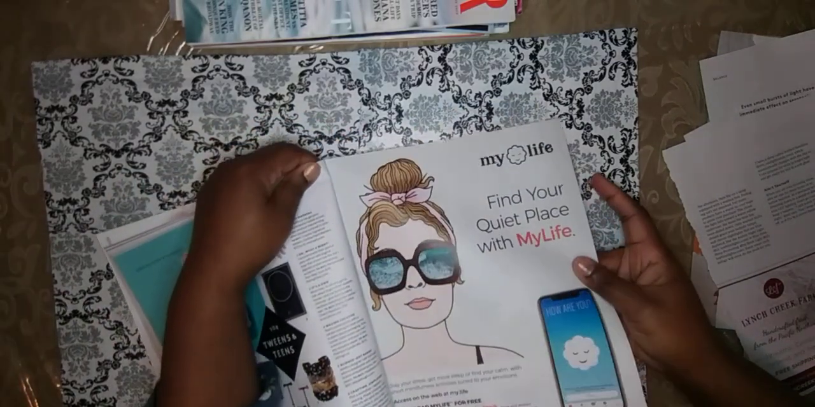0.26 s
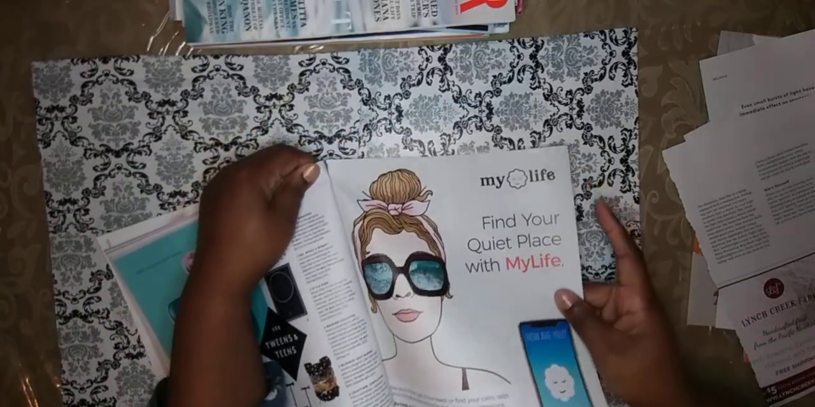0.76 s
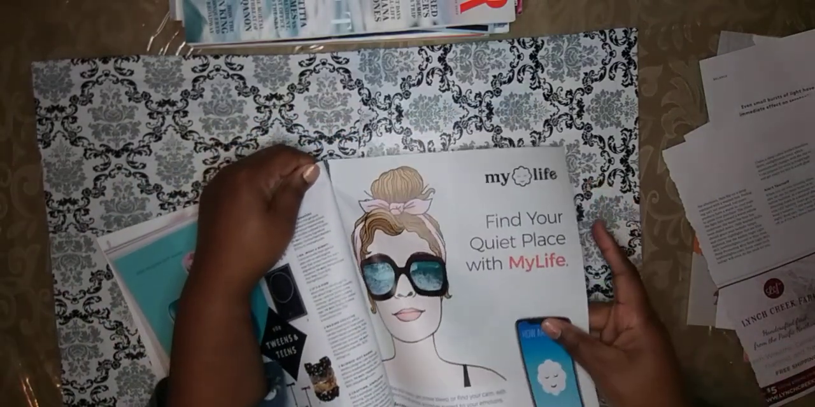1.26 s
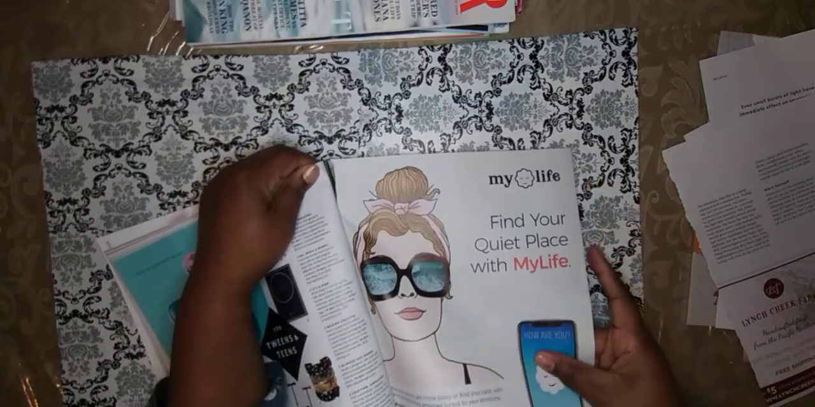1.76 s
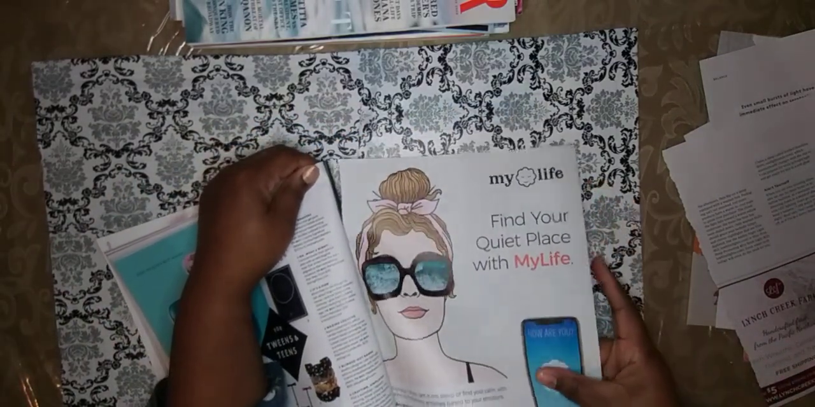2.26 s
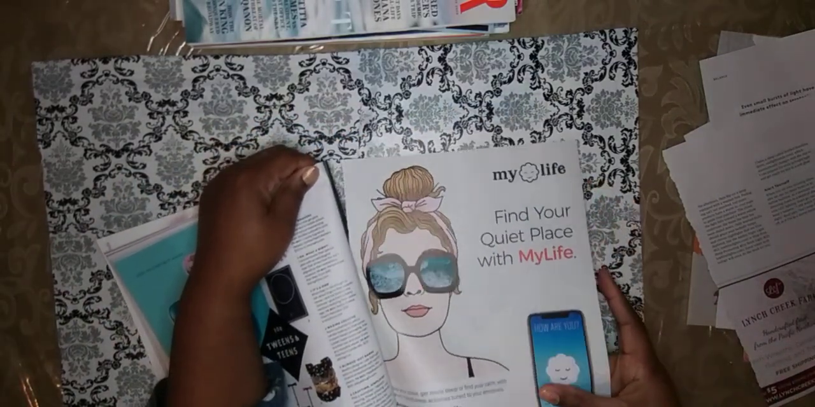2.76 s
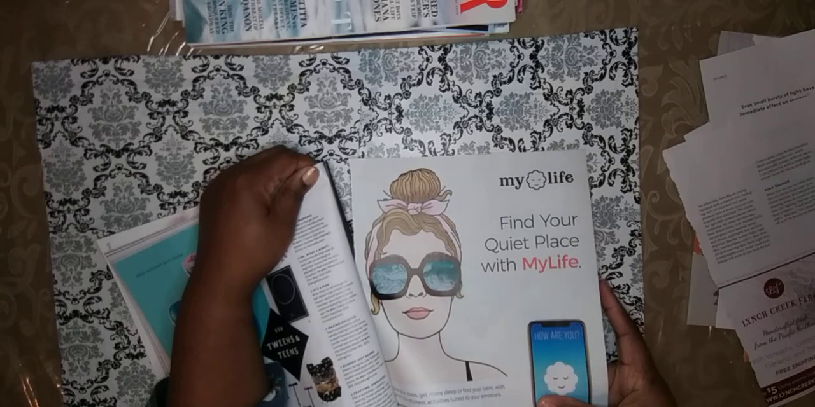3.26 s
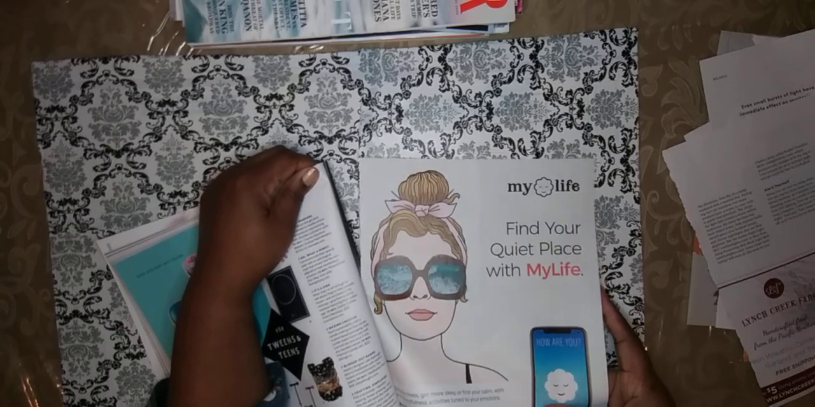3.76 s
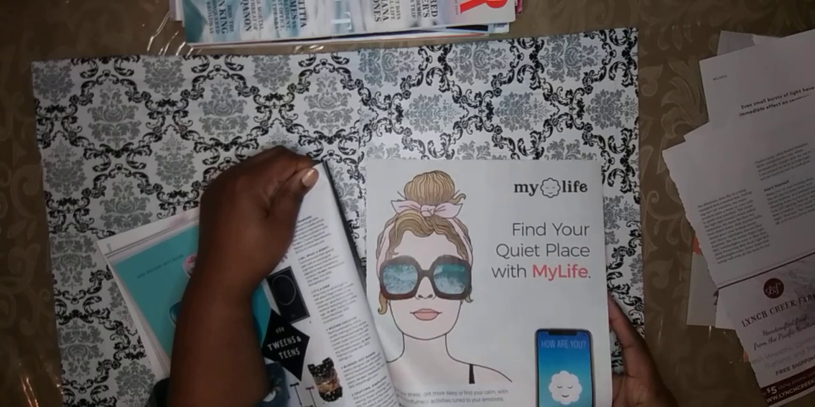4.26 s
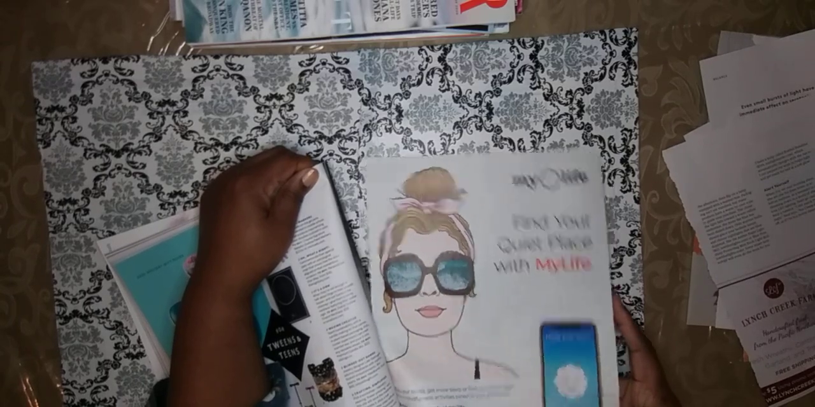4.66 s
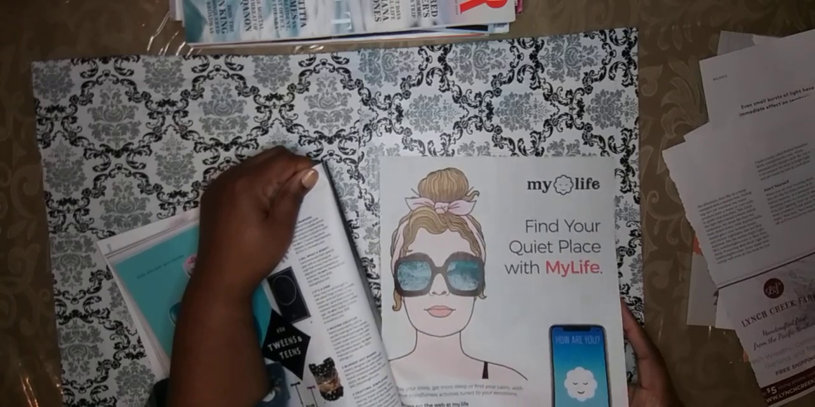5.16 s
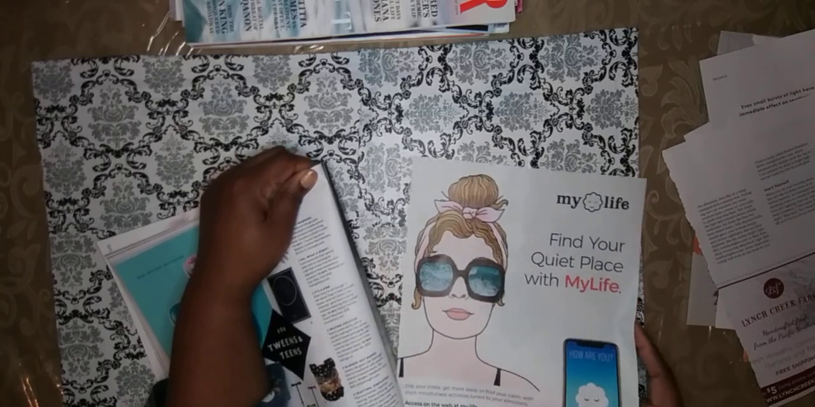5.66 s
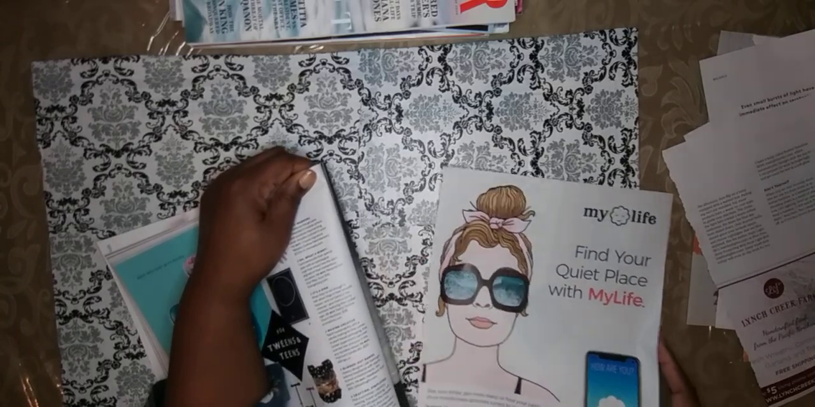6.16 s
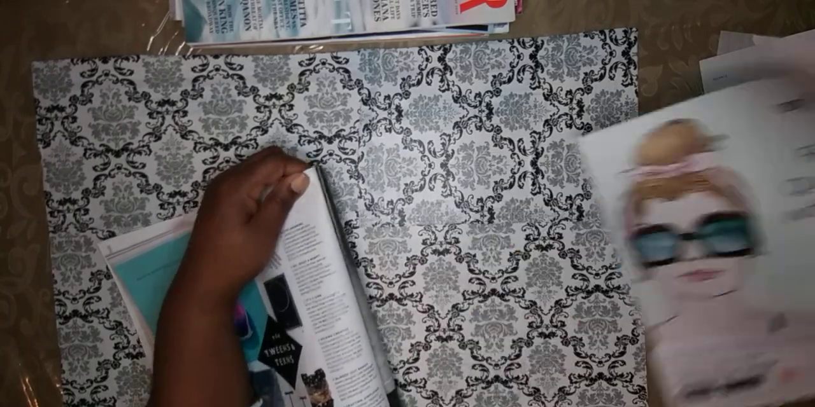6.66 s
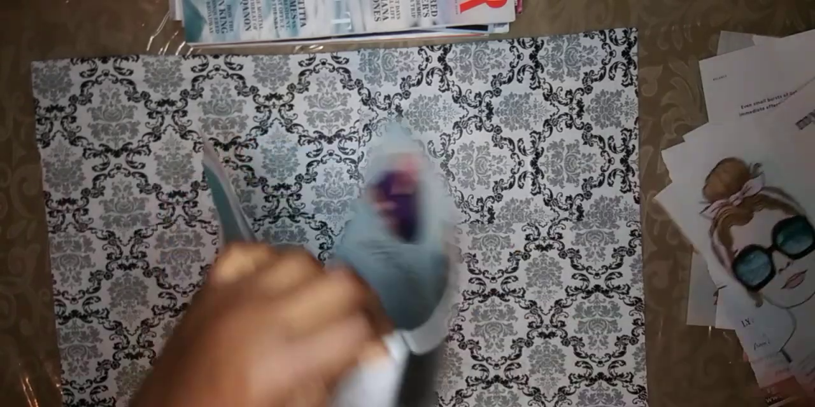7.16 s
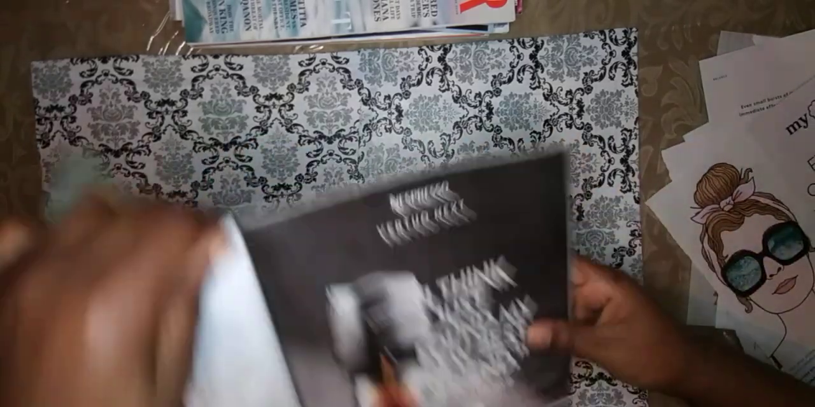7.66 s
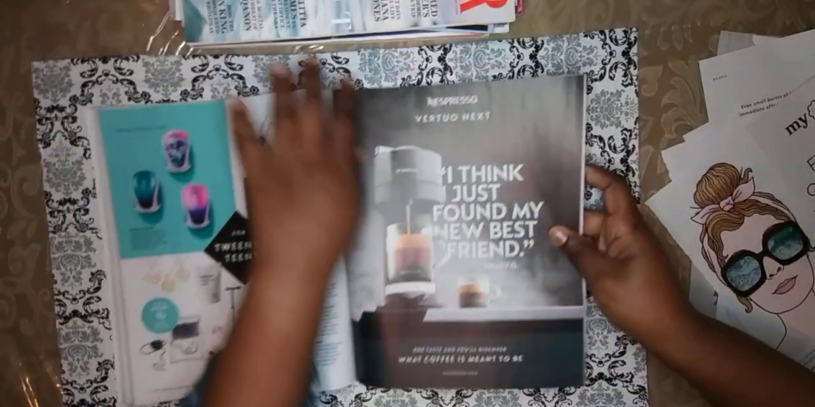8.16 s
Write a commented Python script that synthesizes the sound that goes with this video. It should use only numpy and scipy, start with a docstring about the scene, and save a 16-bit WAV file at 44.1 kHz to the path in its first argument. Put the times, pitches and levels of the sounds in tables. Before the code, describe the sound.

Close, crisp paper tearing in a dozen or so separate tugs along a spine, followed by rustling, light knocks and a faint room hum.

```python
"""In a small room with a mains hum, a glossy page is torn out of a magazine close to the microphone.
It goes along the spine in thirteen short rips; then the loose page is laid aside and the magazine turned over.
Each rip is a few tugs in which the tear sticks and slips; each slip is a volley of random clicks, the snapping
fibres, filtered by the modes of the taut sheet. Buckles and knocks are decaying crackles, rubbing is
uneven grainy noise, the hum is a sum of sines, and sparse decaying reflections make the room."""
import sys
import numpy as np
from scipy import signal
from scipy.fft import rfft, irfft
from scipy.io import wavfile

SR = 44100
rng = np.random.default_rng(int(sys.argv[2]) if len(sys.argv) > 2 else 0)


def transcribe(signal):
    """Save signal, clipped to [-1, 1], as a 16-bit WAV file at the path in sys.argv[1]."""
    frames = np.atleast_2d(signal).T
    limited = np.clip(frames, -1, 1)
    pcm = np.round(limited * 32767).astype(np.int16)
    wavfile.write(sys.argv[1], SR, pcm)


N = 370440  # length in samples

# Hum of mains and motors. Each row: frequency in Hz, level in dB.
HUM_TONES = [(58.8, -44), (105, -51.5), (120, -48), (178, -61)]
# Spectrum of the air noise. Each row: frequency in Hz, relative level in dB.
AIR_SPECTRUM = [(15, -25), (30, -16), (45, -9.5), (68, 3.5), (90, -1), (140, -7), (165, -9.5), (215, -6),
                (270, -15.5), (470, -8.5), (640, -16.5), (1500, -25), (5500, -36.5), (9000, -42),
                (16000, -33)]
# Resonance of the microphone in the top octave. Each row: frequency in Hz, gain in dB.
MIC_RESPONSE = [(6000, 0), (7200, 4.5), (8000, 7.5), (8700, 12), (9250, 7), (10000, -1.5), (11300, -14),
                (15500, -13.5)]
# Reverberation time. Each row: frequency in Hz, time to decay by 60 dB in seconds.
ROOM_T60 = [(150, 0.05), (1000, 0.46), (4000, 0.39), (9000, 0.29), (15000, 0.02)]
# Strength of the reverberation. Each row: frequency in Hz, level in dB.
ROOM_LEVEL = [(150, -13), (700, -7), (2500, -7), (6000, -6), (8700, -13), (11000, -6), (15000, 3)]
# Reflections from the table and the magazine. Each row: delay in seconds, gain as a factor.
NEAR_REFLECTIONS = [(.0014, 0.096), (.0034, 0.23), (.0052, 0.18), (.0087, .18)]

# Strokes of paper on paper or skin. Each row: start in seconds, end in seconds, level of the low rustle
# in dB, level of the high hiss in dB.
STROKES = [(0.071, .111, -47, -58), (0.925, 1.059, -43.5, -42.5), (1.016, 1.155, -38, -66.5),
           (1.438, 1.69, -48, -44.5), (2.171, 2.43, -49.5, -45.5), (2.67, 2.823, -43.5, -50.5),
           (4.312, 4.414, -43.5, -64), (4.493, 4.613, -54, -43), (4.613, 4.848, -46, -47),
           (5.42, 5.52, -51, -49), (5.87, 6.16, -43, -39), (6.308, 6.504, -52, -39),
           (6.542, 6.717, -50.5, -75), (6.716, 6.882, -50, -45.5), (6.851, 7.002, -48, -40.5),
           (6.949, 7.635, -60, -47.5), (7.499, 7.81, -54.5, -45), (7.924, 7.994, -51.5, -50),
           (8.261, 8.44, -75, -53.5)]
# Colour of the low rustle. Each row: frequency in Hz, relative level in dB.
RUSTLE_COLOUR = [(150, -19), (500, 0), (1100, 1.5), (1900, 2.5), (3000, -4.5), (4500, -5), (9000, -38),
                 (16000, -20)]
# Colour of the high hiss. Each row: frequency in Hz, relative level in dB.
HISS_COLOUR = [(1000, -25), (3500, -1.5), (5000, 0.5), (7000, -1), (9000, -1), (16000, -3.5)]

# Knocks of paper on the table. Each row: time in seconds, level in dB, weight of the thud in dB,
# hollow ring in dB, decay time in seconds.
KNOCKS = [(6.597, -33, -22, -14, 0.0067), (6.696, -25, -14, 13, 0.0081), (6.753, -23, -11, 10.5, 0.0055),
          (7.669, -31.5, -11, 2, 0.028), (7.783, -29, 7, -1, .027), (8.047, -20.5, 1, -2, .005),
          (8.174, -43.5, -10, 8, 0.0094)]
# Colour of a knock. Each row: frequency in Hz, relative level in dB.
KNOCK_COLOUR = [(40, -13.5), (90, 3), (170, 1), (240, 0.5), (315, -1.5), (400, 3), (600, -1), (730, 0.5),
                (1100, -3), (2500, -16), (6000, -27), (16000, -54)]
# Buckles of the sheet. Each row: time in seconds, level in dB, brightness in dB, decay time in seconds.
BUCKLES = [(.1257, -6.5, 0, 0.00098), (.134, -22, -13, 0.0034), (.144, -28.5, -30, 0.034),
           (.431, -32.5, -16, 0.0021), (.472, -39.5, -30, .004), (.965, -26, -9, 0.0023),
           (1.047, -23.5, -4, 0.0057), (1.056, -21, -10, .012), (1.122, -25.5, -7.5, 0.0045),
           (1.588, -28, -9, 0.0044), (2.728, -34.5, 8, 0.0056), (2.762, -39, -12, 0.0066),
           (3.553, -34, -4, 0.0045), (3.723, -39.5, -11, 0.004), (5.1267, -33.5, -7, 0.002),
           (6.326, -35.5, -8, 0.0098), (6.389, -35.5, -17, .0056), (6.55, -41, -21, .0046),
           (6.595, -42, -24, 0.0034), (6.659, -40.5, -32, 0.013), (6.877, -37.5, -18, 0.0025),
           (6.899, -36, -8, .006), (7.395, -40.5, 0, 0.0087), (7.53, -37, -9, .0034),
           (7.584, -44, -22, .0045), (7.67, -34, -9, 0.017), (7.783, -29, -16.5, 0.0047),
           (8.047, -27, 2.5, 0.0014)]
# Colour of a buckle. Each row: frequency in Hz, relative level in dB.
BUCKLE_COLOUR = [(80, -23), (250, -10.5), (500, -2.5), (1000, 1.5), (2400, 2.5), (4000, 0), (6500, -2),
                 (9000, -2.5), (16000, -8)]
# Single fibres that give way under tension. Each row: time in seconds, level in dB.
TICKS = [(1.155, -26), (1.2327, -29), (1.2535, -28), (1.702, -24), (2.181, -25), (3.2027, -31),
         (3.8123, -32), (4.2623, -32), (5.4421, -26.5)]

# The rips. Each row: start in seconds, drumming of the taut sheet in dB, brightness in dB, slackness in dB.
RIPS = [(.70, -30, 0.5, 0), (1.22, -14, 9.5, 0.5), (1.658, -12, 1, 1.5), (1.931, -2, 1, -1.5),
        (2.432, .5, 8, -1), (2.931, 1, 10, -1), (3.35, 2.5, 5.5, 0), (3.87, 3, 5.5, -1), (4.39, 3, 5, -1),
        (4.801, -1, -0.5, 3.5), (5.20, -3, 0, 3.5), (5.51, -1.5, -2.5, 6), (5.761, -11, -6.5, 6.5)]
# Tugs on the page. Each row: start in seconds, length in seconds, level of the first slip in dB,
# change of level by the last slip in dB.
TUGS = [(0.715, 0.016, -11.5, -14), (0.735, 0.03, -9, 1.5), (1.2668, 0.062, -7.3, -2),
        (1.34, 0.029, -14.5, -0.5), (1.6708, 0.00081, -22, 0), (1.7115, .001, -22, 0),
        (1.7179, 0.00081, -11.5, 0), (1.954, 0.048, -10, -15), (2.009, .016, -8, -8),
        (2.037, 0.028, -21, -3), (2.4488, .034, -9.5, -9.5), (2.4853, .022, -13.5, -6),
        (2.513, .001, -12, 0), (2.521, .028, -14.5, 1), (2.559, 0.034, -24, 8), (2.946, .015, -15, -8),
        (2.979, .026, -15.5, 0.5), (3.025, .034, -21, 3), (3.369, 0.0006, -16.5, 0),
        (3.395, .03, -14.5, -4), (3.439, 0.0045, -28.5, 0), (3.463, .002, -20, 0), (3.8915, .015, -28, 4),
        (3.907, .022, -14.5, -11), (3.97, 0.0011, -26, 0), (4.0057, 0.068, -12, -15),
        (4.08, 0.034, -16.5, -3), (4.418, 0.047, -20.5, 6), (4.4684, 0.074, -17, -6),
        (4.548, 0.036, -33.5, 2), (4.8425, .016, -12.5, -7), (4.863, 0.05, -13, -11),
        (4.923, 0.055, -19, -12.5), (5, .016, -25.5, 1), (5.217, .016, -11.5, -7.5),
        (5.2705, 0.034, -15.5, -9), (5.3117, .018, -17.5, 0.5), (5.3474, 0.038, -27.5, -2),
        (5.524, .01, -23, 0), (5.5335, .016, -12, -2), (5.5758, 0.074, -20.5, -4), (5.6662, 0.032, -29, 6),
        (5.769, .004, -30, 0), (5.796, .015, -28.5, 10.5), (5.8443, 0.021, -17.5, -9),
        (5.8814, 0.092, -19.5, -4.5), (5.9837, 0.11, -18.5, -5.5), (6.087, .04, -11.5, -9),
        (6.1346, .005, -12, 7.5)]
# Colour of snapping fibres. Each row: frequency in Hz, relative level in dB.
FIBRE_COLOUR = [(60, -34), (160, -15), (260, -9.5), (350, -3), (500, -4.5), (1100, -2), (2000, 0.5),
                (3500, 0), (6000, -1), (9000, 0), (16000, -3)]
# Modes of the taut sheet. Each row: frequency in Hz, width in Hz, level over the fibres in dB.
SHEET_MODES = [(472, 73, 11), (581, 114, 10.5), (723, 68, 15), (944, 220, 1)]
# Treble that crisp fibres favour. Each row: frequency in Hz, share of the rip's brightness.
CRISP_SHARE = [(4000, 0.077), (7000, 0.52), (8700, 0.92), (9700, 0.72), (11500, .48)]
# Loss as the sheet comes free. Each row: frequency in Hz, share of the rip's slackness that is lost.
SLACK_SHARE = [(200, 0.93), (400, 0.21), (580, 0.11), (800, 0.79), (1200, 1.0), (1550, 0.98), (2000, 0),
               (9500, 0), (12000, .25)]

TAPS = 2048  # length of the colouring filters in samples
HZ = np.fft.rfftfreq(TAPS, 1 / SR)
EDGE_HZ = 15900  # upper band limit

# while the hands hold the paper (from s, to s) it never lies quite still
GRIP_S, GRIP_RUSTLE_DB, GRIP_HISS_DB = (.9, 8.4), -58, -57
GRIP_SWELL_DB, GRIP_SWELL_S = 4, .12  # how much and how slowly that faint rustle swells
FLUTTER_DB, FLUTTER_S = 3.5, .015  # sliding paper catches and lets go

# a stroke flexes the sheet: a small buckle, its level in dB over the rustle
CREASE_DB, CREASE_SCATTER_DB, CREASE_DULL_DB, CREASE_S = 2, 1.5, -18, .004
STRAIN_LEAD_S, STRAIN_DB = .03, -36  # a fibre gives way near the start of a rip: earliest lead, mean level

SLIP_GAP_S, SLIP_JITTER = .0085, .36  # mean time between slips, and its scatter as a share of that
SLIP_S, SLIP_SPREAD = .0026, 0.96  # how long a slip of the taut sheet runs, its spread (log factor)
SLIP_SCATTER_DB = 2.2  # rms scatter of the level of slips after the first
SLACK_DRAG = .45  # dB by which a slip runs longer for each dB of slackness
GIVE_S, LEAD_S = .0018, .012  # fibres give before a slip: how fast they build up, how early at most
TENSION_SPREAD = .045  # greatest share by which the modes shift with tension


def amp(db):
    """Amplitude ratio: twenty decibels are a factor of ten."""
    return 10 ** (np.asarray(db) / 20)


def unit(x):
    """Normalisation to a root mean square of one."""
    return x / np.sqrt(np.mean(x ** 2) + 1e-20)


def read(points, hz=HZ):
    """Interpolation of a table of (Hz, value) on a logarithmic frequency axis."""
    f, value = np.transpose(points)
    return np.interp(np.log(hz + 1), np.log(f), value)


def add(mix, s, sound):
    """Superposition: the sound is added to the mix from s seconds on."""
    part = mix[round(s * SR):][:len(sound)]
    part += sound[:len(part)]


def coloured(x, db):
    """Minimum-phase filtering: the log gain, microphone included, fixes the phase of a causal filter."""
    log_gain = np.log(amp(np.maximum(db + read(MIC_RESPONSE), -100)))
    circle = np.concatenate([log_gain, log_gain[-2:0:-1]])
    spectrum = np.exp(np.conj(signal.hilbert(circle)))
    return signal.fftconvolve(x, np.fft.ifft(spectrum).real)


def sized(x, db, seconds):
    """Energy is power times duration: x gets that of a sound of level db lasting so many seconds."""
    return x * amp(db) * np.sqrt(seconds * SR / np.sum(x ** 2))


def wander(n, step_s, size=1024):
    """A random modulation: straight lines join new Gaussian values at every step."""
    return np.interp(np.arange(n) / SR / step_s, np.arange(size), rng.standard_normal(size))


def crackle(n, per_s, spread_db):
    """Impulsive noise: random clicks of either sign, a few much larger than the rest."""
    size = amp(spread_db * np.minimum(rng.exponential(1, n), 4))
    sign = rng.choice([-1, 1], n)
    struck = rng.random(n) < per_s / SR
    return unit(size * sign * struck)


def flex(depth_db):
    """Shape governs radiation: each new bend of the sheet raises some bands and sinks others."""
    knots = np.geomspace(300, 16000, num=26)
    return read(np.transpose([knots, depth_db * rng.standard_normal(len(knots))]))


def background():
    """Stationary sound: a sum of steady hum tones over low, spectrally shaped air noise."""
    t, hz = np.arange(N) / SR, np.fft.rfftfreq(N, 1 / SR)
    hum = np.zeros(N)
    for f, db in HUM_TONES:
        hum += amp(db) * np.sqrt(2) * np.sin(2 * np.pi * (f * t + rng.random()))
    gain = amp(read(AIR_SPECTRUM, hz) + read(MIC_RESPONSE, hz))
    air = irfft(rfft(rng.standard_normal(N)) * gain, N)
    return hum + amp(-44.5) * unit(air)


def room(x):
    """Reverberation: sparse reflections from table and walls, each band decaying exponentially."""
    n = SR // 2
    onset = np.clip((np.arange(n) / SR - .003) / 0.0008, 0, 1)
    reflections = rng.choice([-1., 1.], n) * (rng.random(n) < 3000 / SR) * onset
    hz, t, z = signal.stft(unit(reflections), SR, nperseg=256)
    t60 = read(ROOM_T60, hz)[:, None]
    decay = np.exp(-np.log(1000) * t / t60)
    # gives the decaying response of each band unit energy
    norm = np.sqrt(2 * np.log(1000) / (t60 * SR))
    z = z * amp(read(ROOM_LEVEL, hz)[:, None]) * decay * norm
    response = signal.istft(z, SR, nperseg=256)[1]
    return signal.fftconvolve(x, response)[:N]


def table_top(x):
    """Interference: early reflections from nearby surfaces comb the direct sound."""
    out = x.copy()
    for delay, gain in NEAR_REFLECTIONS:
        add(out, delay, gain * x)
    return out


def slide(speed, rustle_db, hiss_db):
    """Sliding friction: glossy paper moves unevenly, with a grainy rustle and a finer hiss."""
    n, bend = len(speed), flex(depth_db=1.5)
    uneven = speed * amp(FLUTTER_DB * wander(n, FLUTTER_S))
    rustle = coloured(uneven * crackle(n, 900, 3.5), read(RUSTLE_COLOUR) + bend)
    hiss = coloured(uneven * crackle(n, 7000, 3.3), read(HISS_COLOUR) + bend)
    seconds = n / SR / 2
    return sized(rustle, rustle_db, seconds) + sized(hiss, hiss_db, seconds)


def rubbing():
    """Friction noise: strokes swell and fade over the faint, uneven shifting of paper in the hands."""
    out, t = np.zeros(N), np.arange(N) / SR
    held = (t > GRIP_S[0]) * (t < GRIP_S[1])
    shifting = held * amp(GRIP_SWELL_DB * wander(N, GRIP_SWELL_S))
    add(out, 0, slide(shifting, GRIP_RUSTLE_DB, GRIP_HISS_DB))
    for start, end, rustle_db, hiss_db in STROKES:
        n = max(round((end - start) * SR), 256)
        add(out, start, slide(np.sqrt(np.hanning(n)), rustle_db, hiss_db))
    return out


def pop(db, decay, colour, grit_db):
    """Sudden release of energy: a burst of fine crackles under an exponential decay."""
    t = np.arange(SR // 6) / SR
    burst = np.exp(-t / decay) * crackle(len(t), 12000, grit_db)
    return sized(coloured(burst, colour + flex(depth_db=1.86)), db, decay)


def knocks():
    """Impact: page and magazine land on the table with a low thud and a hollow ring."""
    out = np.zeros(N)
    # share of the thud and of the ring that each frequency gets
    thud = read([(150, 0.79), (320, 0)])
    hollow = read([(230, 0), (310, 1.0), (400, 0.46), (485, 0.89), (640, 0)])
    for s, db, thud_db, hollow_db, decay in KNOCKS:
        colour = read(KNOCK_COLOUR) + thud_db * thud + hollow_db * hollow
        add(out, s, pop(db, decay, colour, grit_db=1.0))
    return out


def buckling():
    """Elastic instability: the sheet snaps from one bend to another, faintly so in every stroke."""
    out = np.zeros(N)
    treble = read([(3500, 0.0046), (8000, 1)])  # share of the brightness that each frequency gets
    creases = []
    for start, end, rustle_db, _ in STROKES:
        s = start + (end - start) * rng.uniform(.25, 0.58)
        db = rustle_db + CREASE_DB + CREASE_SCATTER_DB * rng.standard_normal()
        creases.append((s, db, CREASE_DULL_DB, CREASE_S))
    for s, db, bright_db, decay in creases + list(BUCKLES):
        add(out, s, pop(db, decay, read(BUCKLE_COLOUR) + bright_db * treble, grit_db=3.5))
    return out


def fibre_ticks():
    """Brittle failure: single fibres give way under tension, one of them near the start of each rip."""
    out = np.zeros(N)
    strain = []
    for start, *_ in RIPS:
        s = start - STRAIN_LEAD_S * rng.uniform(-0.42, 1)
        strain.append((s, STRAIN_DB + 3 * rng.standard_normal()))
    for s, db in strain + list(TICKS):
        add(out, s, pop(db, 0.001, read(FIBRE_COLOUR) + 8 * read(CRISP_SHARE), grit_db=1.0))
    return out


def drumming(drum_db):
    """Membrane resonance: modes of the taut sheet at a chance tension, in dB over the fibres."""
    tension = 1 + TENSION_SPREAD * rng.uniform(-0.85, 1)
    power = 0
    for hz, width, mode_db in SHEET_MODES:
        detuning = 2 * (HZ - hz * tension) / width
        power = power + amp(mode_db) ** 2 / (1 + detuning ** 2) ** 2
    return 10 * np.log10(1 + power * amp(drum_db) ** 2)


def slips(length, change_db, slack_db, t, most=16):
    """Stick-slip motion: yields (run of the tear, its stragglers, size) for each slip of one tug."""
    chance = rng.uniform(-1, 1, (most, 3))
    chance[0, :2] = 0  # the first slip keeps its time and level
    total = min(max(round(length / SLIP_GAP_S), 1), most)
    for k, (late, loud, long) in enumerate(chance[:total]):
        age = t - SLIP_GAP_S * (k + SLIP_JITTER * late)
        runs_s = min(SLIP_S * amp(SLACK_DRAG * slack_db) * np.exp(SLIP_SPREAD * long), length)
        run = (age >= 0) * np.exp(-np.maximum(age - runs_s, 0) / 0.00042)
        after = np.exp(-abs(age) / np.where(age < 0, GIVE_S, .0105))
        # the root of three turns the uniform chance into one of unit rms
        level_db = change_db * k / max(total - 1, 1) + SLIP_SCATTER_DB * np.sqrt(3) * loud
        yield run, after, amp(level_db)


def tearing(ways=4):
    """Fracture in slips: volleys of snapping fibres with stragglers drive a taut sheet bent in a few ways."""
    out, t = np.zeros(N), np.arange(SR // 6) / SR - LEAD_S
    starts = [row[0] for row in RIPS]
    for s, length, db, change_db in TUGS:
        _, drum_db, bright_db, slack_db = RIPS[max(np.searchsorted(starts, s) - 1, 0)]
        colour = read(FIBRE_COLOUR) + bright_db * read(CRISP_SHARE) - slack_db * read(SLACK_SHARE)
        bends = []
        for _ in range(ways):
            volley, stragglers = crackle(len(t), 9000, 3.5), crackle(len(t), 2200, 4.1)
            bends.append((volley, stragglers, flex(depth_db=1.7) + drumming(drum_db)))
        # successive slips take the bends in turn
        for k, (run, after, size) in enumerate(slips(length, change_db, slack_db, t)):
            volley, stragglers, bend = bends[k % ways]
            fibres = unit(run * volley) + amp(-5.5) * unit(after * stragglers)
            add(out, s - LEAD_S, size * sized(coloured(fibres, colour + bend), db, .0028))
    return out


def scene():
    """Superposition of direct sound, its reverberation and the steady background."""
    still = background()
    rub = rubbing()
    taps = knocks() + fibre_ticks()
    buckles = buckling()
    tear = tearing()
    direct = table_top(tear + buckles + taps + rub)
    # a buckling sheet radiates broadly, so more of it returns from the walls
    to_walls = tear + rub + amp(1) * buckles + amp(-0.5) * taps
    return (direct + room(to_walls) + still)[None]


def record(dry):
    """Saturation and band limiting: the loudest snaps are rounded off, then the top is cut."""
    ceiling = .74
    rounded = dry / (1 + (dry / ceiling) ** 6) ** (1 / 6)
    low_pass = signal.firwin(301, EDGE_HZ, window=("kaiser", 7), fs=SR)
    return signal.oaconvolve(rounded, low_pass[None], "same")


dry = scene()
out = record(dry)
transcribe(out)
```